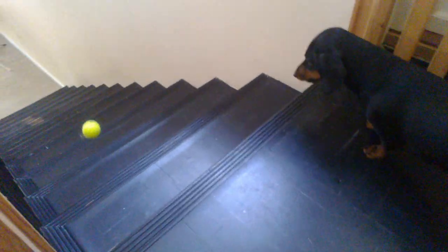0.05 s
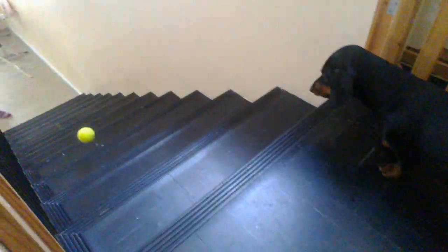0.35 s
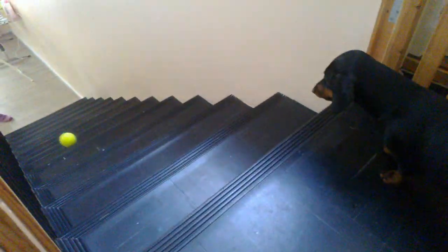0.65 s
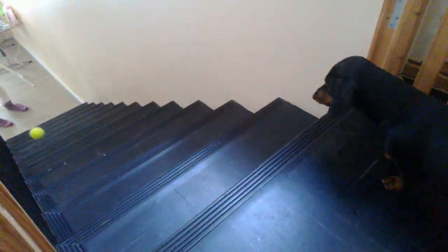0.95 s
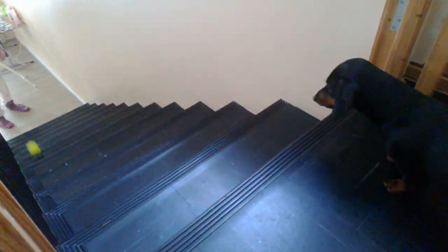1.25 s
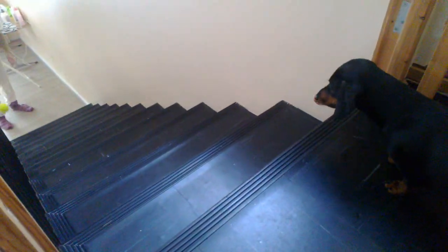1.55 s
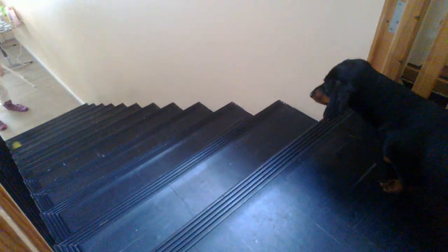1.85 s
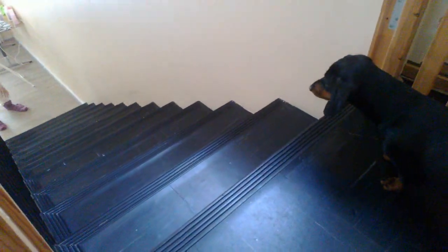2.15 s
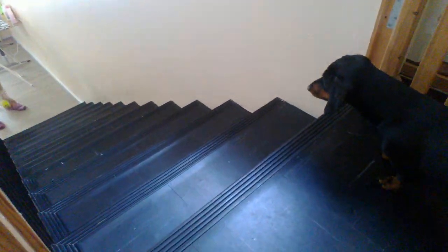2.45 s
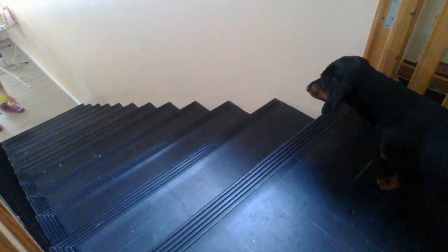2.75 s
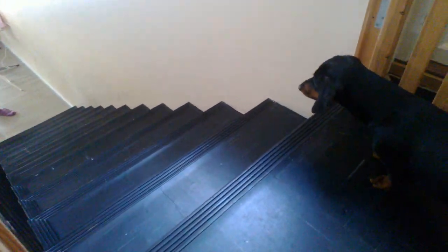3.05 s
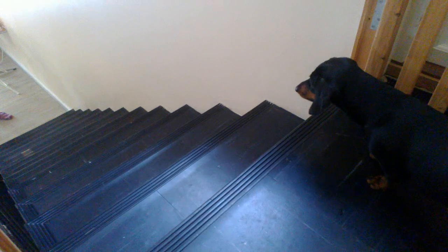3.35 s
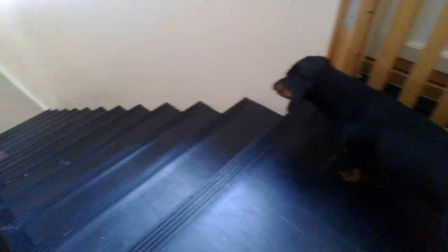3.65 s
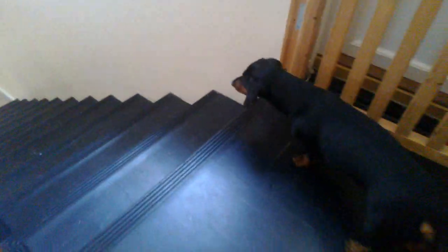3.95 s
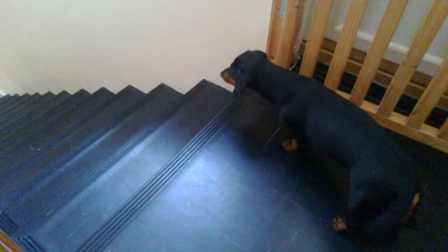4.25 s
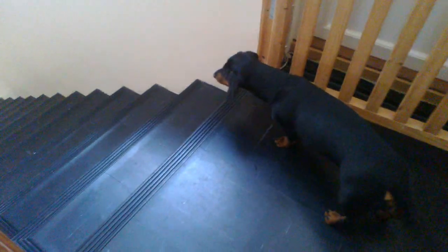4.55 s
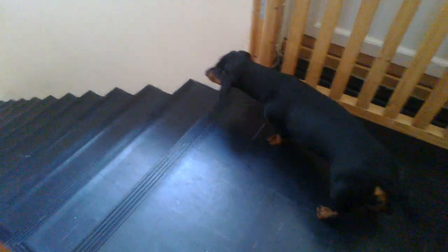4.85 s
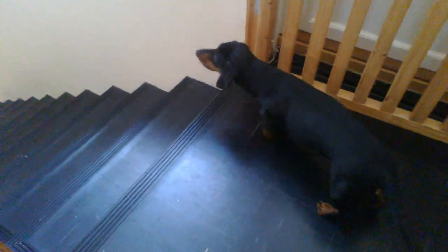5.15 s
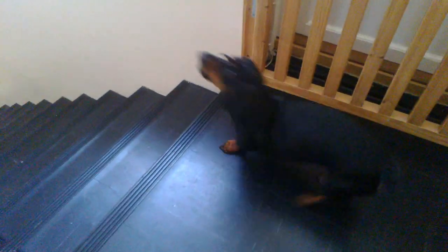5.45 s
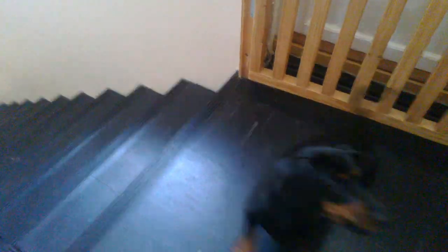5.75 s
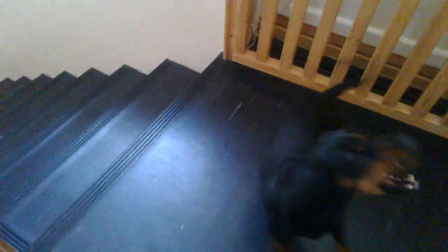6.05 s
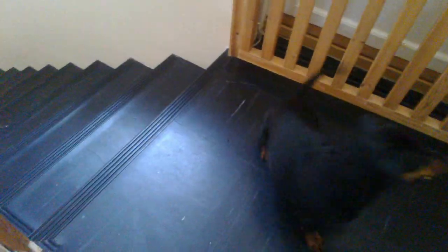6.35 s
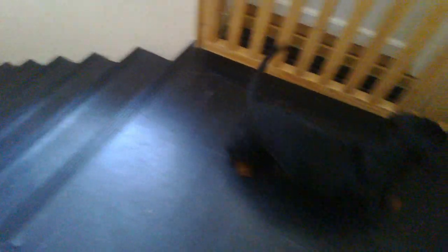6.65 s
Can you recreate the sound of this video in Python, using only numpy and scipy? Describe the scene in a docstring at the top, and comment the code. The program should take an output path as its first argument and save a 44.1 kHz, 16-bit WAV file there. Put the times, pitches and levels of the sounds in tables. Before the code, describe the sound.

A tennis ball bounces away down a wooden staircase in an echoing indoor stairwell, each bounce a hollow pock with a thud and a low boom. After a few small ticks and a lull, a small dog jumps close to the microphone, claws clattering and paws thumping and skidding on the hard floor, while the ball bounces twice nearby. Faint handling rumble and hiss lie underneath.

```python
"""A ball, a staircase and a dog

A tennis ball bounces down a wooden staircase, away from the microphone, and is thrown back up to the
landing. Each bounce is a hollow pock of the shell, a thud and a boom of the stairs, in an echoing
stairwell. A small dog jumps for the ball: claws clatter, and pads thump, brush and skid on the hard floor.
Dull knocks, ticks and rumble lie underneath; an expander turns the hiss down between sounds."""
import sys
import numpy as np
from scipy import signal
from scipy.fft import rfft, irfft
from scipy.io import wavfile

SR = 44100
rng = np.random.default_rng(int(sys.argv[2]) if len(sys.argv) > 2 else 0)


def transcribe(signal):
    """Save signal, clipped to [-1, 1], as a 16-bit WAV file at the path in sys.argv[1]."""
    frames = np.atleast_2d(signal).T
    limited = np.clip(frames, -1, 1)
    pcm = np.round(limited * 32767).astype(np.int16)
    wavfile.write(sys.argv[1], SR, pcm)


N = 304278
TIME = np.arange(N) / SR
RING_TIME = TIME[:SR]   # one second for a sound to die away

# A mode is one tone an object rings at. Its ring time (t60) is how long it takes to fade by 60 dB.
# rumble of the hand-held microphone: (frequency [Hz], level [dB])
RUMBLE_SPECTRUM = [(12, -30), (20, 15.5), (29, -9.5), (70, -14.5), (101, -12.5), (125, -21.5), (173, -17),
                   (226, -31.5), (258, -26), (369, -36), (404, -38.5), (700, -55.5), (910, -40.5),
                   (1540, -120)]
# microphone hiss: (frequency [Hz], level [dB])
HISS_SPECTRUM = [(410, -69), (700, -16), (958, -13.5), (1040, -12), (1150, -10.5), (1380, -12),
                 (1460, -7.5), (1640, -7.5), (2460, -9), (3940, -10.5), (4670, -3.5), (6650, -9),
                 (13700, -2.5), (16000, -3)]
# low rings and knocks: the stairs still ring from a bounce just before the start, then dull thumps come through
# the floor: (time [s], pitch [Hz], level [dB], ring time [s])
LOW_KNOCKS = [(.001, 88.7, -31, 0.31), (0.036, 195, -33, 0.088), (0.141, 93.6, -37, 0.34),
              (5.502, 62, -32, 0.084), (5.643, 65.7, -41.5, 0.38), (6.538, 116, -26, 0.085)]

# the harder the surface, the more treble a bounce keeps
TREAD_HZ, TILE_HZ, WALL_HZ = 1920, 4500, 3070
# bounces: (time [s], strength [dB], distance [m], thud pitch [Hz], boom level [dB], hardness [Hz])
BALL_BOUNCES = [(.259, -51.5, 2.45, 189, -47.5, TREAD_HZ), (.594, -59, 2.05, 187, -47, TREAD_HZ),
                (.881, -53, 4, 171, -50.5, TREAD_HZ), (1.291, -39, 3.4, 173.6, -59, TREAD_HZ),
                (1.933, -39.5, 4.3, 232, -50, TILE_HZ), (2.652, -43.5, 2.95, 185, -43, TILE_HZ),
                (3.124, -64, 2.7, 248, -57, TILE_HZ), (5.838, -32.5, 1.17, 226, -47.5, WALL_HZ),
                (6.564, -36, 1.02, 210, -49.5, TREAD_HZ)]
# the ball's hollow shell: (frequency [Hz], level [dB], ring time [s])
BALL_SHELL_MODES = [(954, 6.5, 0.012), (1088, -19.5, 0.03), (1106, -12.5, 0.14), (1093, 7.5, 0.012),
                    (1370, -6, 0.015)]
# the slap at first touch: (frequency [Hz], level [dB], ring time [s])
BALL_SLAP_MODES = [(1440, -7, 0.017), (1960, 0, 0.0053), (2740, -2.5, 0.0036), (3450, -2.5, 0.0013)]
# the thud of a step: (frequency [multiple of its pitch], level [dB], ring time [s])
STEP_MODES = [(.47, -2, 0.032), (.8, 1, 0.038), (1.002, 1.5, 0.055), (1.281, 1, 0.025), (1.948, -9, 0.021),
              (2.602, -7.5, 0.019)]
# the boom of the whole staircase: (frequency [Hz], level [dB], ring time [s])
BOOM_MODES = [(55.26, -0.5, 1), (82.2, -4.5, 0.45)]
# low tones that swell once more after a bounce: (frequency [Hz], level [dB], ring time [s])
AFTER_RING_MODES = [(57.2, 1.5, 0.53), (77.7, -3, 0.28), (110.4, -1.5, 0.32), (168.4, -5.5, 0.51)]
# the stairwell's echo: (frequency [Hz], ring time [s], build-up time [s])
STAIRWELL_ECHO = [(60.4, 0.93, 0.089), (171, 0.68, 0.0076), (424, 0.52, 0.0085), (1130, 0.48, 0.0081),
                  (2950, 0.77, 0.001), (6100, 0.34, 0.001), (15000, 0.35, 0.001)]
# how alike the echo is left and right: (frequency [Hz], likeness [1 = the same])
ECHO_LIKENESS = [(50, 1), (250, 0.98), (500, 0.88), (1000, 0.72), (2000, -0.2), (5000, 0.016),
                 (15000, 0.19)]
# small dry ticks: (time [s], level [dB])
DRY_TICKS = [(3.037, -38.5), (3.364, -38), (3.501, -54), (3.59, -51.5), (4.511, -52)]

# claws and paws scraping the hard floor: (frequency [Hz], level [dB])
SCRAPE_SPECTRUM = [(1000, -16), (2000, -9.5), (3900, -10), (4800, -2.5), (6500, -4), (9500, -2.5),
                   (14000, -3), (16000, -7)]
# quick swipes of a paw: (time of the peak [s], level [dB])
PAW_SWIPES = [(5.424, -47), (5.808, -44.5), (5.962, -39.5), (6.514, -45.5), (6.89, -50)]
# the dog jumps towards the microphone and runs off: (time [s], distance [m])
DOG_DISTANCES = [(5.6, 1.47), (6.05, 0.65), (6.9, 2.5)]
# claws hit the floor: (time [s], level [dB], scrape length [s])
CLAW_STRIKES = [(5.447, -41, 0.0055), (5.542, -62, 0.0033), (5.620, -45.5, 0.011), (5.680, -56.5, 0.002),
                (5.7345, -50, 0.0053), (5.890, -53, 0.01), (5.9685, -37, 0.0021), (5.972, -39.5, 0.0024),
                (6.136, -48.5, 0.0089), (6.157, -39.5, 0.0064), (6.172, -38.5, .014), (6.377, -45.5, .0028),
                (6.8685, -47.5, 0.0025)]
# soft pads land: (time [s], level [dB])
PAD_LANDINGS = [(5.448, -55.5), (5.542, -53), (5.620, -55), (5.680, -53.5), (5.972, -47), (5.998, -43),
                (6.010, -44.5), (6.047, -48), (6.172, -47), (6.377, -58), (6.538, -53), (6.859, -52)]
# the thump of a pad: (frequency [Hz], level [dB], ring time [s])
THUMP_MODES = [(75.5, 2, 0.034), (205, -4, 0.083), (328, -8, 0.067), (513, 1, 0.015), (930, 7.5, 0.0055),
               (1556, 3, 0.0067)]
# the tones of a skidding pad: (frequency [Hz], level [dB])
SKID_TONES = [(205, -10), (324, -1), (398, -9.5)]


def from_db(db):
    """Turn decibels into a gain."""
    return 10 ** (np.asarray(db) / 20)


def unit_energy(x):
    """Scale a sound so that its squares sum to one."""
    return x / np.sqrt(np.sum(x ** 2) + 1e-20)


def at_hz(points, hz, column=1):
    """Read between the rows of a table, on a scale of octaves."""
    table = np.array(points)
    return np.interp(np.log(hz), np.log(table[:, 0]), table[:, column])


def add(out, s, sound):
    """Mix a sound in, starting at s seconds."""
    start = max(round(s * SR), 0)
    out[..., start:start + sound.shape[-1]] += sound[..., :N - start]


def panned(left_db):
    """Two gains that make the left channel left_db louder than the right."""
    return from_db([[left_db / 2], [-left_db / 2]])


def filtered(x, kind, hz, order=2):
    """Keep what is below hz ("low"), above it ("high") or between two values ("band")."""
    return signal.sosfilt(signal.butter(order, hz, kind, fs=SR, output="sos"), x + 1e-18)


def tinted(x, spectrum):
    """Give a sound a spectrum; white noise keeps its power."""
    size = x.shape[-1]
    hz = np.maximum(np.arange(size // 2 + 1) * SR / size, 1)
    gain = from_db(at_hz(spectrum, hz))
    return irfft(rfft(x) * gain / np.sqrt(np.mean(gain ** 2)), size)


def stereo(mid, side, alike):
    """Blend two noises into left and right; alike = 1 makes both the same."""
    return np.sqrt((1 + alike) / 2) * mid + np.sqrt((1 - alike) / 2) * side * [[1], [-1]]


def coloured(spectrum, alike):
    """Stereo noise with a given spectrum and a power of one."""
    mid, side = tinted(rng.standard_normal((2, N)), spectrum)
    noise = stereo(mid, side, alike)
    return noise / noise.std()


def flicker(depth_db, rate_hz):
    """A factor that wanders at random around one."""
    slow = filtered(rng.standard_normal(N + SR), "low", rate_hz)[SR:]
    return from_db(depth_db * slow / slow.std())


def fading_tone(hz, db, t60):
    """One mode, dying away."""
    return from_db(db - 60 * RING_TIME / t60) * np.sin(2 * np.pi * hz * RING_TIME)


def swelling_tone(hz, db, t60):
    """A low mode of the floor that swells and dies."""
    return fading_tone(hz, db, t60) * (1 - np.exp(-RING_TIME / .01))


def ring(modes):
    """A blow sets several modes ringing, every second one upside down."""
    return unit_energy(sum((-1) ** k * fading_tone(*mode) for k, mode in enumerate(modes)))


def rumble_and_hiss():
    """The hand holding the microphone makes a lumpy rumble; the microphone itself hisses."""
    rumble = from_db(-52) * coloured(RUMBLE_SPECTRUM, alike=0.51) * flicker(depth_db=4.0, rate_hz=21)
    hiss = from_db(-58.5) * coloured(HISS_SPECTRUM, alike=0.03)
    return rumble * panned(left_db=1.0) + hiss * panned(left_db=-4.0)


def knocks():
    """Each low ring or dull knock is a single low mode of the stairs or floor."""
    out = np.zeros(N)
    for s, hz, db, t60 in LOW_KNOCKS:
        add(out, s, swelling_tone(hz, db, t60))
    return out * panned(left_db=3.0)


def noise_bands(size):
    """Stereo noise in bands a third of an octave wide, each with its centre frequency."""
    edges = np.geomspace(20, 18000, 30)
    white = rng.standard_normal((2, 2, size + SR // 4))
    for k, (low, high) in enumerate(zip(edges, edges[1:])):
        mid, side = filtered(white[k % 2], "band", [low, high])[:, -size:]
        hz = np.sqrt(low * high)
        yield hz, stereo(mid, side, at_hz(ECHO_LIKENESS, hz))


def stairwell_echoes(count):
    """One echo for each place of impact: near walls answer first, the lows swell later and last longer."""
    echoes = 0
    near_walls = 1 + 0.8 * np.exp(-RING_TIME / 0.025)
    for hz, band in noise_bands(count * SR):
        t60 = at_hz(STAIRWELL_ECHO, hz, column=1)
        build_up_s = at_hz(STAIRWELL_ECHO, hz, column=2)
        shape = near_walls * from_db(-60 * RING_TIME / t60) * (1 - np.exp(-RING_TIME / build_up_s))
        echo = band.reshape(2, count, SR) * shape
        # every place feeds the room with the same energy
        power = np.mean(echo ** 2, axis=(0, 2), keepdims=True)
        echoes = echoes + echo * np.sqrt(band.var() * np.mean(shape ** 2) / power)
    return echoes.swapaxes(0, 1)


def in_room(pulse, echo, direct_db, left_db, right_lag_samples=7):
    """A sound arrives directly, a little later on the right, along with its echo."""
    response = echo.copy()
    response[[0, 1], [0, right_lag_samples]] += np.sqrt(SR / 100) * from_db(direct_db)
    return signal.fftconvolve(pulse[None], response, axes=1) * panned(left_db)


def ball(squash_s=0.00319, after_ring_s=0.27, middling_db=-38, shadow_db_per_m=2.5):
    """The shell pocks and slaps at first touch; thud and boom follow as the ball squashes into the step."""
    out = np.zeros((2, N))
    shell = filtered(ring(BALL_SHELL_MODES), "low", 2210, order=4)
    boom = filtered(ring(BOOM_MODES), "low", 210)
    boom *= 1 - np.exp(-RING_TIME / 0.034)   # the whole staircase is slow to swing
    boom /= boom[:SR // 10].std()
    after_ring = sum(swelling_tone(*mode) for mode in AFTER_RING_MODES)
    echoes = stairwell_echoes(len(BALL_BOUNCES))
    for (s, strength_db, metres, pitch, boom_db, hard_hz), echo in zip(BALL_BOUNCES, echoes):
        # with a stronger bounce the thud grows slowly, the slap fast
        thud_db = middling_db + 0.14 + 0.59 * (strength_db - middling_db)
        slap_db = middling_db - 8 + 1.17 * (strength_db - middling_db)
        pock = from_db(strength_db) * shell + from_db(slap_db) * ring(BALL_SLAP_MODES)
        pock = filtered(pock, "low", hard_hz, order=4)
        step = ring([(multiple * pitch, db, t60) for multiple, db, t60 in STEP_MODES])
        thud = from_db(thud_db) * filtered(step, "low", 3500)
        # distance weakens the direct sound; further down, the stairs also hide more of the thud
        direct_db = 8 - 20 * np.log10(metres)
        thud_direct_db = direct_db + 7 - shadow_db_per_m * metres
        add(out, s, in_room(pock, echo, direct_db, left_db=0.5))
        add(out, s + squash_s, in_room(thud, echo, thud_direct_db, left_db=3.0))
        add(out, s + squash_s, from_db(boom_db) * boom * panned(left_db=3.5))
        add(out, s + after_ring_s, from_db(thud_db - 10.5) * after_ring * panned(left_db=4.0))
    return out


def ticks(pitch_hz=560, t60=0.0023):
    """A tone that dies almost at once is heard as a tiny tick."""
    out = np.zeros(N)
    tick = filtered(ring([(pitch_hz, 0, t60)]), "low", 1700, order=6)
    for s, db in DRY_TICKS:
        add(out, s, from_db(db) * tick / np.abs(tick).max())
    return out * panned(left_db=3.0)


def scuff(start_s=5.40, rise_s=0.01, fall_s=0.033):
    """Paws brush the floor steadily once the dog moves, and each swipe swells and fades."""
    level = from_db(-58) * np.clip((TIME - start_s) / rise_s, 0, 1)
    for s, db in PAW_SWIPES:
        swipe = from_db(db) * np.exp(-np.maximum((s - TIME) / rise_s, (TIME - s) / fall_s))
        level = np.hypot(level, swipe)
    return level * flicker(depth_db=2.5, rate_hz=49) * coloured(SCRAPE_SPECTRUM, alike=0.073)


def claws(echoes, edge_db=5, edge_scrape_s=0.0036):
    """Each claw clicks and slips over the floor for a few milliseconds."""
    out = np.zeros((2, N))
    scrape = coloured(SCRAPE_SPECTRUM, alike=0.081)
    scrape *= flicker(depth_db=2.0, rate_hz=490)   # a claw catches and lets go
    claw_echoes = tinted(echoes, SCRAPE_SPECTRUM)
    for k, (s, claw_db, length_s) in enumerate(CLAW_STRIKES):
        metres = np.interp(s, *np.transpose(DOG_DISTANCES))
        direct_db = 6 - 20 * np.log10(metres)
        contact = (1 - np.exp(-RING_TIME / .0004)) * np.exp(-RING_TIME / length_s)
        scrape_now = np.roll(scrape, -round(s * SR), axis=1)[:, :SR]
        click = np.sqrt(SR / 50) * unit_energy(contact * scrape_now)
        # the shorter the scrape, the sharper its edge of top treble
        edge = filtered(click, "high", 11000, order=1)
        click += (from_db(edge_db) - 1) * edge_scrape_s / length_s * edge
        room_fill = np.sqrt(np.cumsum(unit_energy(contact) ** 2))   # the echo builds as the claw scrapes
        echo = claw_echoes[k % len(echoes)] * room_fill
        add(out, s, from_db(claw_db) * (from_db(direct_db) * click + echo) * panned(left_db=-1.5))
    return out


def pads(echoes, middling_db=-53.5, db_per_octave=2.5):
    """Soft pads thump on the floor; a heavier step is a harder contact and sounds brighter."""
    out = np.zeros((2, N))
    for k, (s, pad_db) in enumerate(PAD_LANDINGS):
        hard_hz = min(1050 * 2 ** ((pad_db - middling_db) / db_per_octave), SR * .45)
        thump = from_db(pad_db) * unit_energy(filtered(ring(THUMP_MODES), "low", hard_hz))
        add(out, s, in_room(thump, echoes[k % len(echoes)], direct_db=5.0, left_db=2.5))
    return out


def skid(start_s=5.674, rise_s=0.0074, hold_s=0.044, t60=0.39):
    """A pad sticks and slips, making a short, unsteady low note."""
    age = TIME - start_s
    fade_db = 60 * np.maximum(age - hold_s, 0) / t60
    level = np.clip(age / rise_s, 0, 1) * from_db(-44.5 - fade_db)
    pitch_wobble = flicker(depth_db=.4, rate_hz=85)
    phase = 2 * np.pi * np.cumsum(pitch_wobble) / SR
    note = sum(from_db(db) * np.sin(hz * phase) for hz, db in SKID_TONES)
    return level * flicker(depth_db=4.0, rate_hz=57) * note * panned(left_db=3.5)


def scene():
    """Ball, dog and background sounds together."""
    bounces = ball()
    dog_echoes = stairwell_echoes(count=8)
    dog = claws(dog_echoes) + pads(dog_echoes) + scuff() + skid()
    return rumble_and_hiss() + knocks() + bounces + ticks() + dog


def expander(x, closed_db=-64, open_db=-54, depth_db=5.5, smooth_s=0.0063):
    """Turn everything down while the middle frequencies are quiet."""
    middle = filtered(x.mean(axis=0), "band", [400, 3000])
    keep = np.exp(-1 / (smooth_s * SR))
    smooth_power = signal.lfilter([1 - keep], [1, -keep], middle ** 2)
    level_db = 10 * np.log10(smooth_power + 1e-14)
    return x * from_db(np.interp(level_db, [closed_db, open_db], [-depth_db, 0]))


def record(dry, low_cut_hz=28, high_cut_hz=16200):
    """The deepest rumble is lost, quiet stretches are turned down and the top treble is cut."""
    heard = expander(filtered(dry, "high", low_cut_hz))
    treble_cut = signal.ellip(10, .1, 70, high_cut_hz, fs=SR, output="sos")
    return signal.sosfilt(treble_cut, heard)


dry = scene()
out = record(dry)
transcribe(out)
```